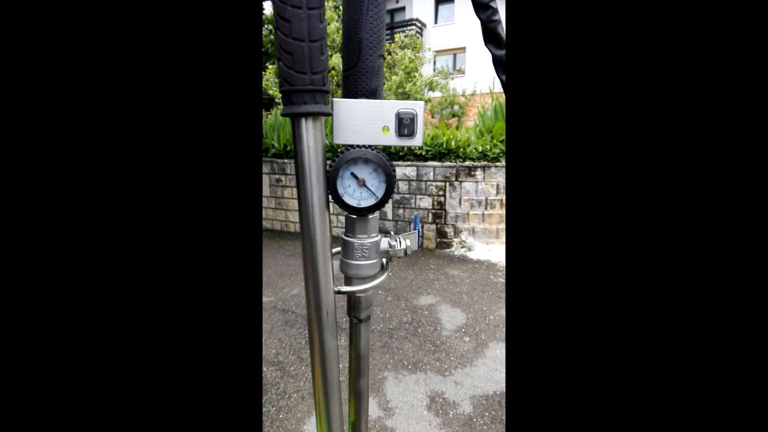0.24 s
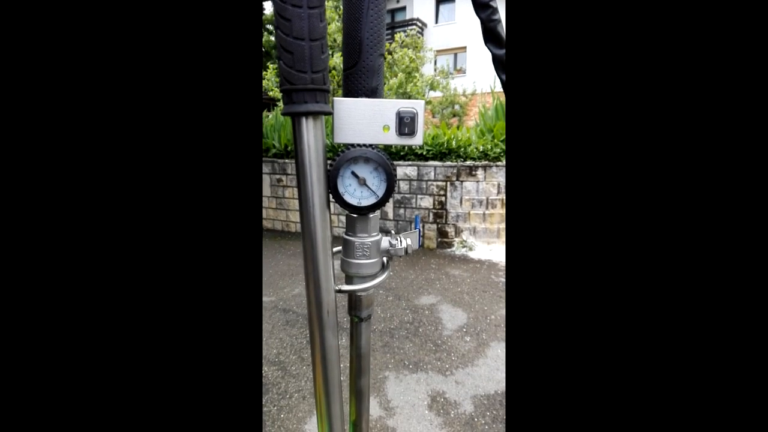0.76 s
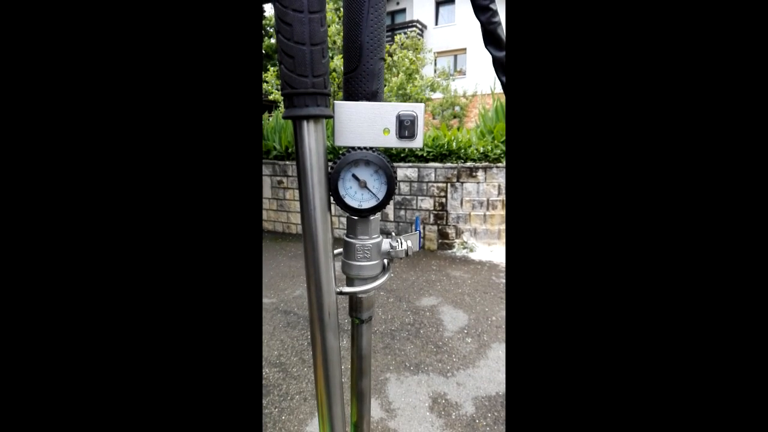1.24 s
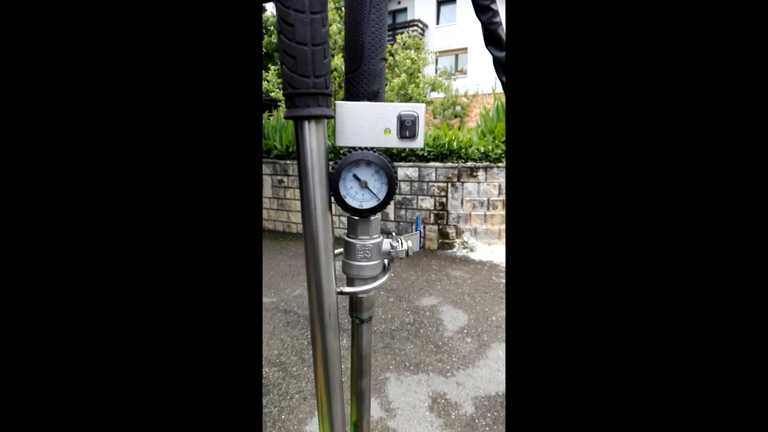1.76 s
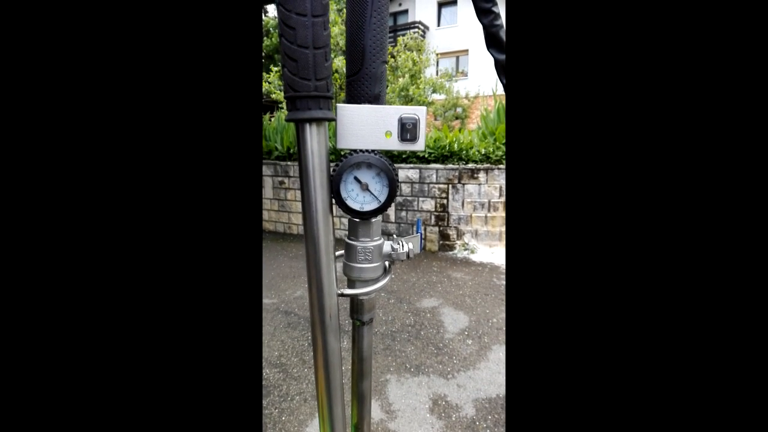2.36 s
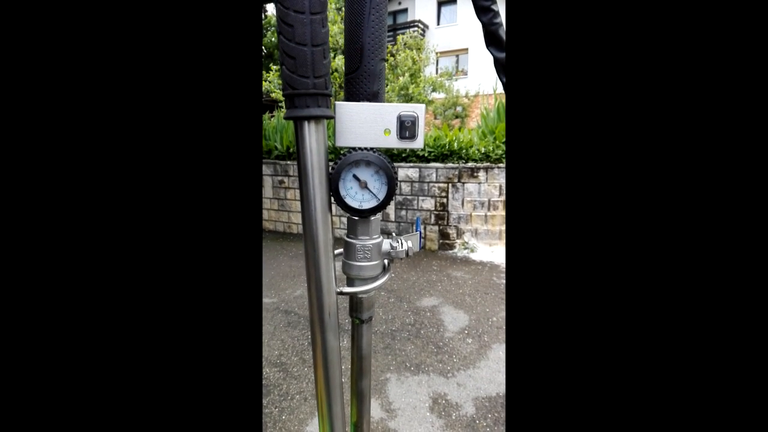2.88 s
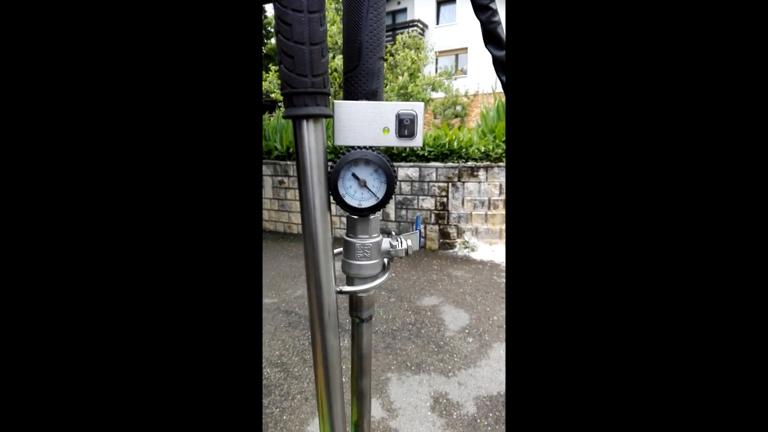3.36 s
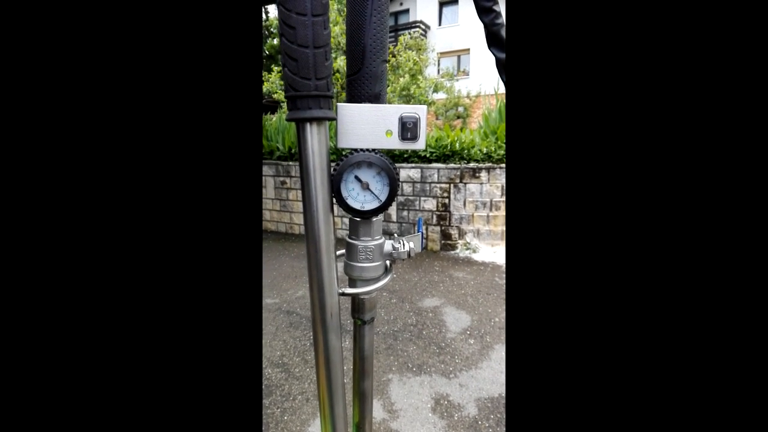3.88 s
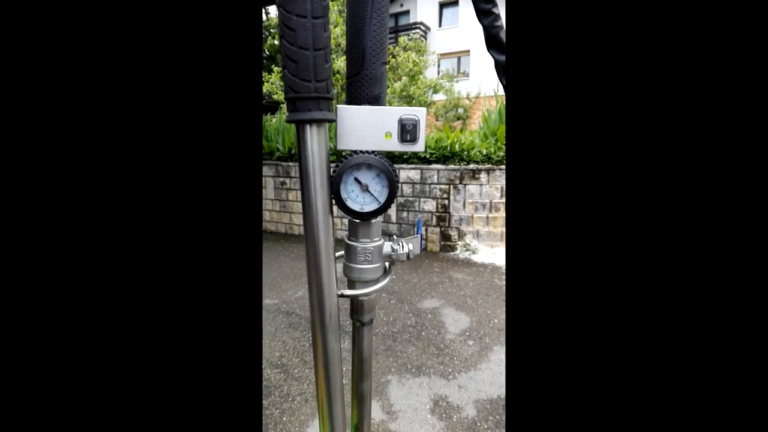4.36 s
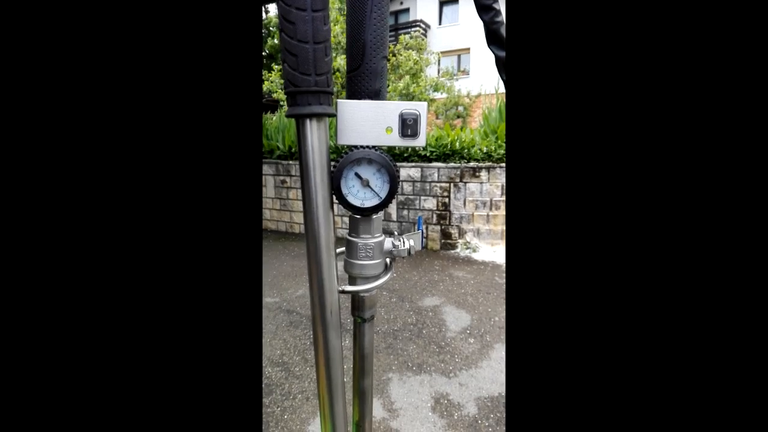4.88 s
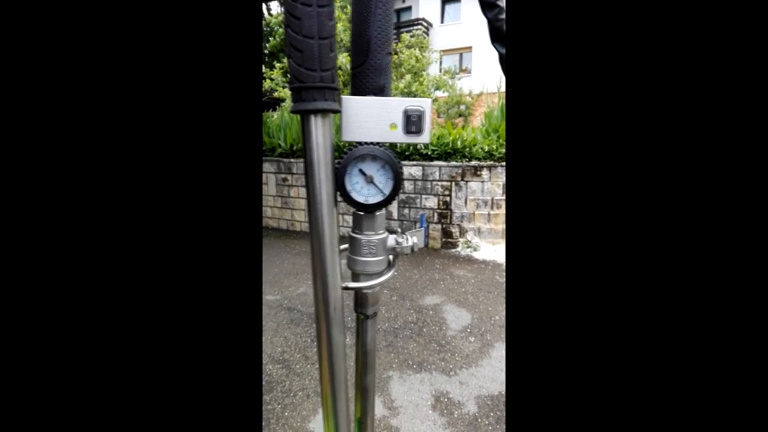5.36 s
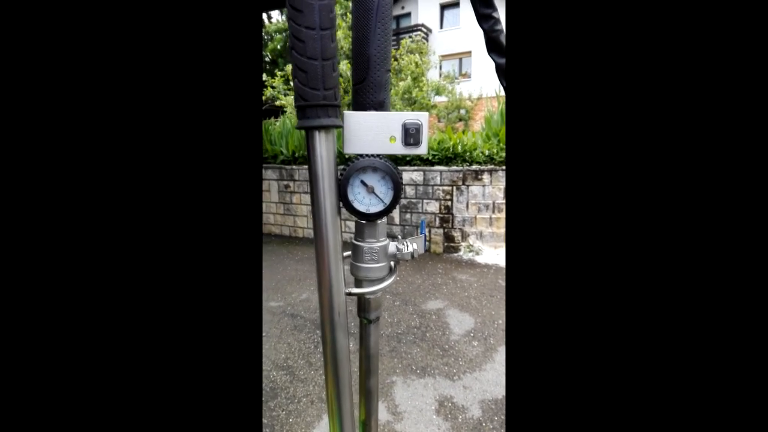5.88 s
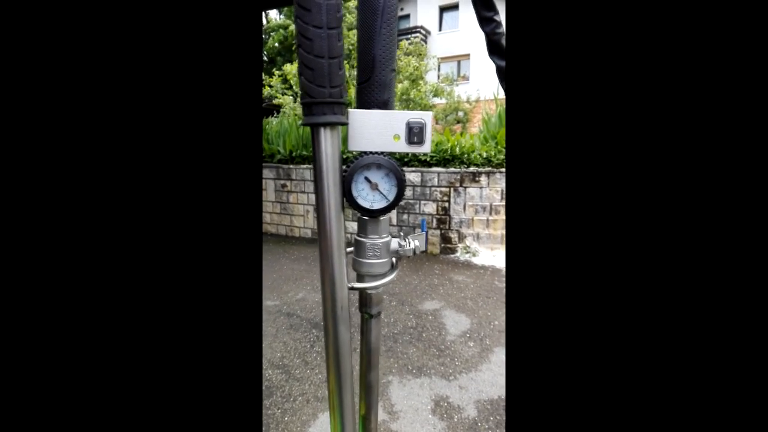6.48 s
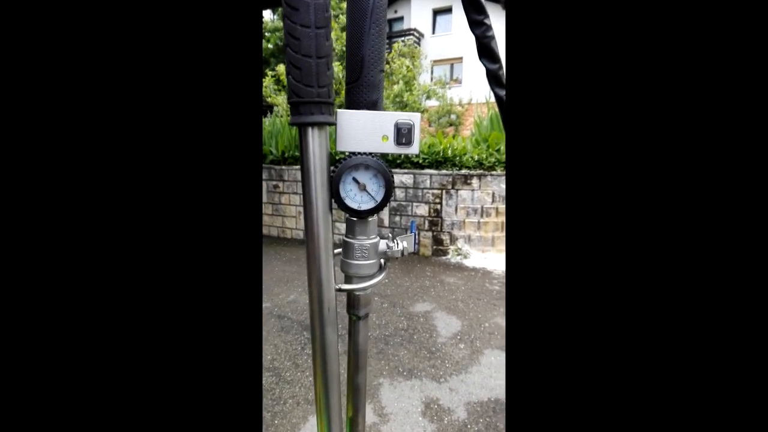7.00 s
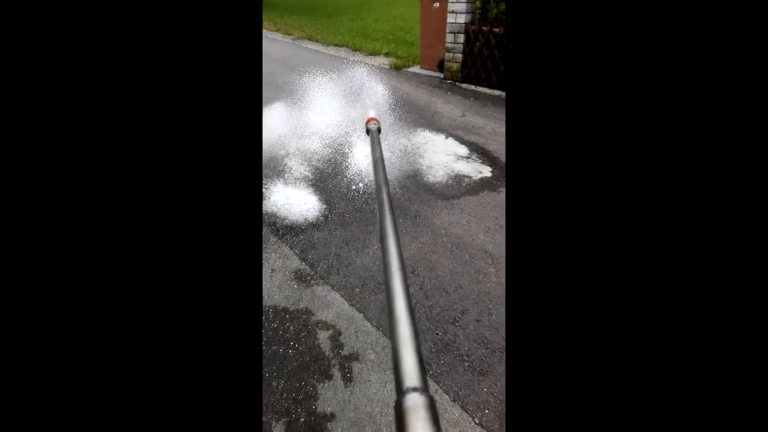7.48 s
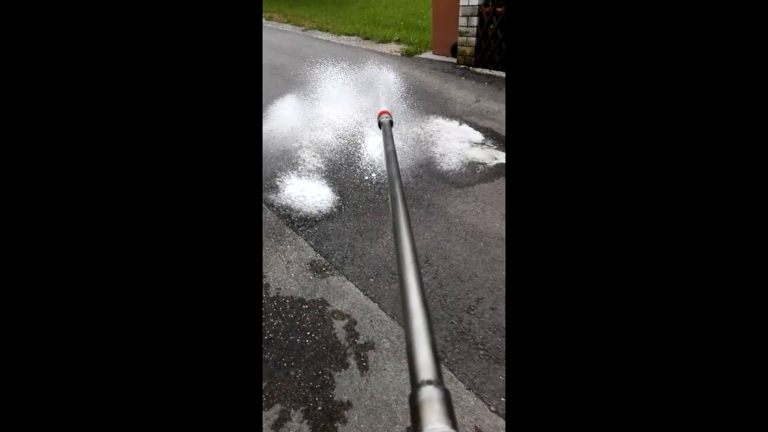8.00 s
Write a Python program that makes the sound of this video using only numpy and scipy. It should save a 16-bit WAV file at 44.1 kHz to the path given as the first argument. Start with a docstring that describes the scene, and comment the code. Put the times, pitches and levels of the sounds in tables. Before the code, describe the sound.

Fast, even motor knocking with wind buffets and chirping birds stops abruptly; air bleeds away, a quiet garden follows, then a spray nozzle hisses.

```python
"""Garden sprayer compressor outdoors

A small piston compressor knocks steadily and switches off; each blow rings its casing, and air bleeds away as noise.
Sparrows chirp as gliding sines echoed by house walls; gusts buffet the microphone as low, uneven noise.
At the end a lance opens and sputters foam: a shaped hiss with bursts for slugs of liquid."""
import sys
import numpy as np
from scipy import signal
from scipy.fft import rfft, irfft
from scipy.io import wavfile
from scipy.ndimage import uniform_filter1d

SR = 44100
rng = np.random.default_rng(int(sys.argv[2]) if len(sys.argv) > 2 else 0)


def store_pcm(level_fs):
    """Save levels as 16-bit WAV."""
    pcm = np.round(np.clip(level_fs, -1, 1) * 32767).astype(np.int16)
    wavfile.write(sys.argv[1], SR, np.atleast_2d(pcm).T)


N = 363825
T = np.arange(N) / SR  # s

# Speed of the compressor shaft. Each row: time in seconds, speed in turns per second.
SHAFT = [(0.0, 45.696), (0.8, 45.721), (1.6, 45.631), (2.4, 45.52), (3.2, 45.483), (3.9, 45.385),
         (4.3, 45.124), (4.55, 45.058), (4.72, 43.188)]
STOP_S = 4.686  # the regular strokes end
LEAD = SR // 4  # samples of lead-in, so that the casing already rings at time 0


def undb(db):
    """A level in decibels is 20 times the logarithm of an amplitude ratio."""
    return 10 ** (np.asarray(db) / 20)


def level(x, db):
    """Scaling by the root mean square sets the mean power of a signal."""
    return x * undb(db) / np.sqrt(np.mean(x ** 2))


def curve(table):
    """Linear interpolation turns the columns of a (s, value, ..) table into values at every sample."""
    s, *columns = np.transpose(table)
    return [np.interp(T, s, c) for c in columns]


def ring(x, hz, db, early=0, size=8192):
    """The cepstrum of a gain curve fixes its phase: ringing follows each input, but for a share `early` before it."""
    f = np.arange(size // 2 + 1) * SR / size
    log_gain = np.interp(np.log(f + 1), np.log(hz), db) * np.log(10) / 20
    cepstrum = irfft(log_gain)
    cepstrum[1:size // 2] *= 2 * (1 - early)
    cepstrum[size // 2 + 1:] *= 2 * early
    response = np.roll(irfft(np.exp(rfft(cepstrum))), size // 2)
    return signal.oaconvolve(x, response)[size // 2:][:len(x)]


def noise(colour, x=None):
    """Filtering white noise (or x) imposes a spectral colour; the result has rms 1."""
    white = rng.standard_normal(N) if x is None else x
    return level(ring(white, *np.transpose(colour), size=2048), 0)


def band(x, hz, width_hz):
    """A two-pole resonance passes a band whose width is its frequency over its quality factor."""
    return signal.lfilter(*signal.iirpeak(hz, hz / width_hz, fs=SR), x)


def walk(rate):
    """Slow random modulation: levels held for 1 / rate seconds and smoothed twice, with spread 1."""
    hold = int(SR / rate)
    steps = np.repeat(rng.standard_normal(N // hold + 1), hold)
    smooth = uniform_filter1d(uniform_filter1d(steps, hold), hold)[:N]
    return smooth / smooth.std()


def swell(start, length, power):
    """Envelope of a finite event: its samples, its progress 0-1 and a half sine raised to a power."""
    i = np.arange(int(start * SR), min(int((start + length) * SR), N))
    u = (i - i[0]) / (length * SR)
    return i, u, np.sin(np.pi * u) ** power


def garden():
    """Ambient sound as stationary coloured noise, plus narrow resonant bands of noise for faint far hums and whistles."""
    # Spectrum of the quiet garden. Each row: frequency in Hz, relative density in dB.
    colour = [(59, -38), (100, -4), (139, -2.5), (211, -24), (327, -23), (690, -27.5), (962, -23.5),
              (1040, -23), (2250, -29), (5620, -28.5), (14300, -42.5)]
    # Faint far hums and whistles. Each row: start in seconds, length in seconds, centre in Hz, filter width in Hz,
    # level before the swell in dB.
    far_tones = [(5.25, 1.25, 970, 70, -73), (5.2, .45, 1650, 150, -75), (6.25, .4, 128, 20, -60),
                 (6.52, .28, 1870, 30, -79), (6.86, .32, 2075, 25, -78), (7.03, .07, 2075, 15, -69)]
    out = level(noise(colour) * undb(0.63 * walk(5)), -60.5)
    white = rng.standard_normal(N)
    for start, length, hz, width, db in far_tones:
        i, _, env = swell(start, length, 0.28)
        tone = band(band(white, hz, width), hz, width)
        out[i] += env * level(tone, db)[i]
    return out


def wind():
    """Turbulent eddies at the microphone: a lumpy rumble, flutter that grows faster with the gust, and buffets."""
    # Gust strength. Each row: time in seconds, rumble level in dB.
    strength = [(0, -34), (.3, -35.5), (.75, -25), (1.3, -29), (1.7, -19), (2.1, -27.5), (2.45, -27),
                (2.85, -40), (3.3, -36), (3.7, -27.5), (4.2, -32), (4.8, -46), (5.5, -41), (5.72, -49.5),
                (6.15, -41), (6.6, -64.5), (7.1, -55.5), (7.5, -39), (7.65, -54), (8.1, -29)]
    # Single buffets. Each row: middle in seconds, length in seconds, rumble peak in dB, flutter peak in dB.
    buffets = [(0.264, .08, -27, -38), (0.353, 0.071, -22, -29), (0.483, 0.086, -20, -44),
               (.61, 0.063, -29, -48), (.73, 0.12, -21, -50), (0.954, 0.11, -15.5, -24),
               (1.016, 0.081, -21, -28), (1.184, 0.14, -18.5, -31), (1.402, 0.053, -17.5, -38),
               (1.506, 0.038, -19, -27), (1.553, .06, -22, -21), (1.634, .07, -14, -33),
               (1.798, 0.15, -16.5, -25), (1.936, 0.065, -19, -23.5), (2.006, 0.034, -33, -19.5),
               (2.073, 0.13, -17, -34), (2.35, .07, -26, -31), (2.45, 0.057, -18.5, -30),
               (2.664, 0.064, -30.5, -50), (3.283, 0.074, -31, -49), (3.526, 0.13, -26, -37),
               (3.739, .08, -19.5, -26.5), (3.874, .06, -23, -34), (3.968, 0.14, -44, -26.5),
               (4.058, 0.084, -34, -29), (4.281, 0.058, -13, -26), (4.327, 0.037, -30, -12),
               (4.393, 0.16, -20, -36), (4.517, 0.065, -25.5, -55), (4.664, 0.11, -34, -37),
               (4.986, 0.12, -27, -46), (5.148, 0.16, -29.5, -49.5), (5.34, .05, -40, -57),
               (5.41, 0.033, -27, -52), (5.556, 0.036, -36, -36), (5.612, 0.043, -33, -33),
               (5.826, 0.051, -29.5, -65), (5.879, 0.066, -32.5, -60), (6.087, 0.046, -29, -41.5),
               (7.255, 0.11, -46, -49.5), (7.902, .08, -27.5, -43), (8.024, 0.073, -32, -48),
               (8.113, 0.097, -20, -44)]
    # Spectra of rumble and flutter. Each row: frequency in Hz, relative density in dB.
    rumble_colour = [(12, -14), (25, -4), (45, 0), (65, -4), (100, -8), (140, -17.5), (200, -34.5),
                     (400, -74)]
    flutter_colour = [(40, -22), (70, -8.5), (110, 3), (170, -3.5), (230, -13.5), (320, -28.5),
                      (600, -74.5)]
    lumps_db = 2
    # flutter level when the rumble is at -30 dB, and its gain in dB for each dB of rumble
    flutter_db, flutter_slope = -42, 1.42

    eddies = rng.standard_normal(N) * undb(2.06 * walk(25))
    rumble_db = curve(strength)[0] + lumps_db * walk(11)
    power = undb([rumble_db, flutter_db + flutter_slope * (rumble_db + 30)]) ** 2
    for middle, length, *db in buffets:
        i, _, env = swell(middle - length / 2, length, 1.75)
        power[:, i] += (undb(db)[:, None] * env) ** 2  # unrelated sources add in power
    out = np.zeros(N)
    for p, colour in zip(power, (rumble_colour, flutter_colour)):
        out += np.sqrt(p) * level(ring(eddies, *np.transpose(colour)), 0)
    return out


def yard(x):
    """Reflection and reverberation: one clear wall, and a blur from the houses that moving leaves smear in pitch."""
    wall_delay_s, wall_db = 0.023, -10
    blur_db = -5  # gain of a blur for a sound spread over many frequencies
    t = T[:SR // 2]
    tails = rng.standard_normal((2, len(t))) * np.minimum(t / 0.01, 1)
    tails *= np.exp(-t / 0.068)
    tails *= 1000 ** (-np.maximum(t - 0.14, 0) / 0.09)  # a steeper fall after 0.14 s
    tails *= undb(blur_db) / np.sqrt(np.sum(tails[0] ** 2))
    # two unrelated blurs trade places as the leaves sway
    sway = 2 * np.pi * np.cumsum(130 * walk(150)) / SR
    blur = [signal.oaconvolve(x, tail)[:N] for tail in tails]
    wall = undb(wall_db) * np.roll(x, int(wall_delay_s * SR))
    return wall + blur[0] * np.cos(sway) + blur[1] * np.sin(sway)


def sparrows():
    """Frequency-modulated sines: arched cheeps and hoarse chatter, which flutters and excites the yard less."""
    # Double cheeps. Each row: start in seconds, top pitch in Hz, level in dB, gap to the second arch in seconds,
    # its top pitch in Hz, its level in dB, share of the fall sung 0-1.
    cheeps = [(0.291, 6000, -42.5, 0.08, 5650, -43, 1), (2.899, 5930, -35, .082, 5850, -41, 0.95),
              (3.276, 5900, -35.5, 0.091, 5550, -40, 1), (4.192, 6000, -41, 0.085, 5600, -40.5, 0.8),
              (5.879, 5960, -38.5, .083, 5510, -39, 1), (6.867, 6040, -52.5, 0.09, 5780, -48, 0.95)]
    # Chatter. Each row: start in seconds, length in seconds, start pitch in Hz, end pitch in Hz,
    # level before the flutter in dB.
    chatter = [(0.138, 0.047, 4430, 4000, -54), (0.353, 0.011, 5300, 4380, -41.5),
               (0.603, 0.086, 5050, 5000, -55), (0.753, 0.022, 4350, 4260, -51),
               (1.82, 0.029, 5100, 4900, -50), (2.345, .025, 4280, 4320, -42.5),
               (2.375, 0.028, 4300, 3920, -47), (2.406, 0.045, 4380, 4250, -48),
               (2.449, 0.019, 3860, 3820, -45), (2.491, 0.033, 3780, 4250, -47.5),
               (3.024, .014, 4900, 4580, -46.5), (3.091, 0.044, 5000, 5100, -52),
               (3.251, .01, 5050, 4930, -45), (3.344, 0.057, 4300, 4480, -41),
               (3.428, 0.052, 3700, 4320, -47), (4.244, .035, 4360, 4250, -41),
               (4.328, .025, 3620, 4230, -44), (4.42, 0.079, 5170, 4950, -54),
               (4.675, 0.064, 4900, 5030, -56), (4.742, .03, 4700, 4770, -55),
               (4.76, 0.15, 5120, 4860, -65), (4.97, 0.059, 4460, 3770, -51.5),
               (5.026, 0.043, 3900, 3430, -54), (5.056, 0.072, 4020, 3440, -58),
               (5.15, 0.062, 3770, 3970, -68), (5.931, 0.036, 4000, 3680, -54.5),
               (6.44, 0.048, 4330, 4260, -53.5), (6.517, .014, 3480, 3530, -55),
               (6.524, 0.031, 4550, 4150, -49), (6.536, 0.029, 4220, 3870, -44.5),
               (6.568, 0.015, 3450, 3630, -54), (6.612, .012, 3600, 3770, -49),
               (6.622, 0.023, 3980, 3700, -52), (6.636, 0.019, 3480, 3880, -57),
               (6.98, .024, 5050, 5500, -50), (7.048, 0.034, 4000, 4850, -51.5)]
    # first and second arch of a cheep: times in seconds, end pitches as shares of the top
    rise_s, fall_s = (.03, .04), (.034, .022)
    from_share, to_share = (.74, .64), (.72, .68)
    foot_db, end_db = -15, -7  # start and end of an arch against its top
    cheep_rough, chatter_rough = .3, .7  # hoarseness 0-1
    near, far = np.zeros(N), np.zeros(N)
    flutter, waver = walk(220), walk(300)

    def add(i, hz, db, env, rough):
        """Phase is the running integral of frequency; hoarseness disturbs both pitch and level."""
        hz = hz * (1 + 0.045 * rough * waver[i])
        amplitude = np.sqrt(2) * undb(db + 7.1 * rough * flutter[i]) * env
        note = amplitude * np.sin(2 * np.pi * np.cumsum(hz) / SR)
        near[i] += note
        far[i] += undb(-8 * rough) * note

    for start, top_1, db_1, gap, top_2, db_2, sung in cheeps:
        arches = zip((start, start + gap), (top_1, top_2), (db_1, db_2), from_share, to_share, rise_s, fall_s)
        for s, top, db, a, c, up, down in arches:
            i, _, env = swell(s, up + sung * down, 0.35)
            t = T[i] - s
            rise = np.sin(np.pi / 2 * np.clip(t / up, 0, 1)) ** 2.2
            fall = (np.maximum(t - up, 0) / down) ** 1.7
            hz = top * (a + (1 - a) * rise - (1 - c) * fall)
            add(i, hz, db + foot_db * (1 - rise) + end_db * fall, env, cheep_rough)
    for start, length, a, c, db in chatter:
        i, u, env = swell(start, length, 0.4)
        add(i, a + (c - a) * u, db, env, chatter_rough)
    return near + yard(far)


def taps():
    """Damped free vibration: each light tick of plastic is a sine that decays in 11 ms."""
    # Ticks near the machine. Each row: start in seconds, amplitude before decay in dB, frequency in Hz.
    ticks = [(1.1463, -48, 2000), (1.2341, -41, 2010), (2.4623, -32.5, 1960), (2.6165, -40, 2000),
             (4.654, -38, 2500), (4.8259, -71, 2000)]
    out, t = np.zeros(N), T[:SR // 20]
    for s, db, hz in ticks:
        out[int(s * SR):][:len(t)] += undb(db) * np.sin(2 * np.pi * hz * t) * np.exp(-t / 0.011)
    return out


def lance():
    """Turbulent nozzle flow: air and foam hiss, droplets crackle, and slugs of liquid add duller bursts."""
    # Opening of the jet. Each row: time in seconds, level in dB.
    jet_level = [(7.158, -88), (7.17, -53), (7.202, -45.5), (7.306, -36.5), (7.444, -31.5), (7.67, -31),
                 (7.68, -22), (7.716, -24.5)]
    # Spectra of jet and slugs. Each row: frequency in Hz, relative density in dB.
    jet_colour = [(120, -21), (200, -5.5), (296, -30), (354, -19), (897, -19.5), (981, -14.5), (1770, -14),
                  (2480, -17.5), (3550, -7), (5850, 1.5), (6400, -5.5), (7250, -1), (8670, -8), (9650, -8),
                  (14300, -15)]
    slug_colour = [(300, -7), (1000, -6), (2000, -1), (4000, 6), (7000, -0.5), (14000, -15)]
    # Slugs among the air. Each row: start in seconds, level before decay in dB, decay time in seconds.
    slugs = [(7.22, -42.5, 0.076), (7.297, -38, 0.019), (7.331, -38, 0.019), (7.444, -30, 0.025),
             (7.528, -29.5, 0.023), (7.599, -31.5, 0.055), (7.68, -22.5, 0.015), (7.73, -28, .03),
             (7.784, -25, 0.014), (7.835, -24.5, 0.026), (7.881, -25, 0.022), (7.97, -24.5, 0.055),
             (8.048, -23.5, 0.029), (8.1796, -23, 0.04)]

    crackle_db = 1.7 * rng.exponential(size=N // 16 + 1).repeat(16)[:N]
    drops = rng.standard_normal(N) * undb(crackle_db)
    jet_gain = undb(curve(jet_level)[0] + walk(40)) * (T > jet_level[0][0])
    jet = jet_gain * noise(jet_colour, drops)
    gate = np.zeros(N)
    for s, db, decay_s in slugs:
        first = int(s * SR)
        t = T[first:] - s
        gate[first:] += undb(db) * np.minimum(t / 0.0038, 1) * np.exp(-t / decay_s)
    return jet + gate * noise(slug_colour, drops[::-1])  # reversed, so unlike the jet


def pulses(turn, place, jitter_s, scatter_db, last):
    """Periodic impulses, one band-limited click per turn at `place`, then the last blows (s, dB); LEAD comes first."""
    count = np.arange(-8, int(turn[-1]))
    jitter, scatter = rng.standard_normal((len(count), 2)).T
    # before time 0 the shaft turns at its first speed
    s = np.interp(count + place, turn, T) + np.minimum(count + place - turn[0], 0) / SHAFT[0][1]
    on = s < STOP_S
    at = np.r_[(s + jitter_s * jitter)[on], last[:, 0]] * SR + LEAD
    size = undb(np.r_[scatter_db * scatter[on], last[:, 1]])
    # a windowed sinc places each click between samples
    samples = at.astype(int)[:, None] + np.arange(-8, 9)
    off = samples - at[:, None]
    out = np.zeros(N + LEAD)
    np.add.at(out, samples, size[:, None] * np.sinc(off) * np.cos(np.pi * off / 18) ** 2)
    return out


def compressor():
    """Impulsive excitation of resonances: knocks ring the casing, valves tick, and air rushes with the stroke."""
    # Radiation of the casing. Each row: multiple of the shaft rate, relative gain in dB.
    casing = [(1, -2.5), (2, 3), (3, -2), (4, -30.5), (5, -10), (6, -6), (7, -11.5), (8, -6.5), (9, -5.5),
              (10, -29), (11, -29), (12, -21.5), (13, -9), (14, -14.5), (15, -17.5), (16, -14), (17, -15),
              (18, -33.5), (19, -37), (20, -32), (21, -23.5), (22, -17.5), (23, -18.5), (24, -26.5),
              (25, -15), (26, -12), (27, -6), (28, -10), (29, -6), (30, -3.5), (31, -30), (32, -12.5),
              (33, -11), (34, -18), (35, -22), (36, -18), (37, -32), (38, -24.5), (39, -22.5), (40, -18),
              (41, -29), (42, -29), (43, -31), (44, -40)]
    # Valve ticks. Each row: place in the turn 0-1, level in dB.
    tick_places = [(0.29, -51), (0.92, -61.5), (0.0515, -65.5), (.71, -67)]
    # Resonances of the valves. Each row: frequency in Hz, filter width in Hz, relative gain in dB.
    valve_modes = [(2490, 300, 1), (3003, 274, 5.5), (3523, 326, 4), (4046, 274, 3.5), (5180, 760, -3.5),
                   (5750, 176, 0), (6860, 440, -6), (8400, 3400, -26)]
    # Spectra of pumped air with rattle, and of bled air. Each row: frequency in Hz, relative density in dB.
    rattle_colour = [(150, -34), (250, 0), (415, -7), (468, -10.5), (593, -8), (739, -5), (860, -9),
                     (1110, -10), (1360, -2), (2180, -20), (2960, -21.5), (4090, -17.5), (5640, -21),
                     (6450, -29.5), (14300, -41.5)]
    bleed_colour = [(150, -20), (250, 2), (445, -4.5), (583, -5.5), (1340, -2.5), (2340, -11), (5090, -6.5),
                    (6790, -15.5), (14300, -20)]
    # Air bleeding off after the stop. Each row: time in seconds, level in dB.
    bleed_level = [(4.66, -80), (4.72, -53.5), (4.85, -55.5), (5.25, -57), (5.34, -66.5), (5.7, -94)]
    # Return of the knock round the frame. Each row: delay in seconds, share fed round 0-1.
    paths = [(.0098, .84)]
    # Last blows as the switch opens. Each row: time in seconds, knock in dB and tick in dB against a running stroke.
    stall = np.array([(4.688, -34, -2), (4.699, -3, -30), (4.705, -2, 3)])
    casing_shaft_hz = 45.5  # shaft rate that the casing multiples refer to
    build_up = .33  # share of the ringing that swells under compression, before the knock
    knock_db, rattle_db = -31.5, -39.5  # rms over the whole length, before the fades at the stop
    halt_s, halt_decay_s = 4.73, .02  # the piston comes to rest and the casing falls silent

    turn = .495 + np.cumsum(curve(SHAFT)[0]) / SR
    order, db = np.transpose(casing)
    hz = np.r_[20, order * casing_shaft_hz, 2600, 6000]
    blows = pulses(turn, 0, .00003, .4, stall[:, :2])
    knock = ring(blows, hz, np.r_[-25, db, -50, -75], build_up)
    for delay, share in paths:
        # an allpass spreads the blow in time and keeps its colour
        gap = np.zeros(int(delay * SR) - 1)
        knock = signal.lfilter(np.r_[share, gap, 1], np.r_[1, gap, share], knock)

    ticks = np.zeros(N + LEAD)
    for k, (place, tick_db) in enumerate(tick_places):
        last = np.zeros((0, 2)) if k else stall[:, ::2]  # only the first tick joins the last blows
        ticks += level(pulses(turn, place, .00005, .9, last), tick_db)
    valve = np.zeros(N + LEAD)
    for k, (f, width, gain_db) in enumerate(valve_modes):
        valve += (-1) ** k * undb(gain_db) * band(band(ticks, f, width), f, width)
    valve *= ticks.std() / valve.std()

    # the rush of air peaks at two places in the turn
    stroke = 1 + 0.38 * np.exp(-(turn % 1) / 0.019) + .5 * np.exp(-((turn - .33) % 1) / 0.014)
    running = np.exp(-np.maximum(T - STOP_S, 0) / 0.054)
    rattle = level(stroke * noise(rattle_colour), rattle_db) * running
    bleed = undb(curve(bleed_level)[0]) * (T > bleed_level[0][0]) * noise(bleed_colour)
    halt = np.exp(-np.maximum(T - halt_s, 0) / halt_decay_s)
    return (level(knock, knock_db) + valve)[LEAD:] * halt + rattle + bleed


def scene():
    """Superposition: sound pressures of all the sources add, alike in both channels."""
    mono = garden() + wind() + sparrows() + taps() + lance() + compressor()
    return np.array([mono, mono])


def record(dry):
    """Band limitation: an elliptic low-pass cuts both channels steeply above 14300 Hz."""
    return signal.sosfilt(signal.ellip(14, .2, 70, 14300, fs=SR, output="sos"), dry)


dry = scene()
out = record(dry)
store_pcm(out)
```